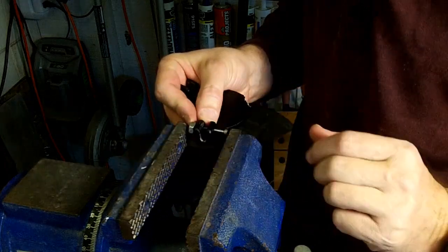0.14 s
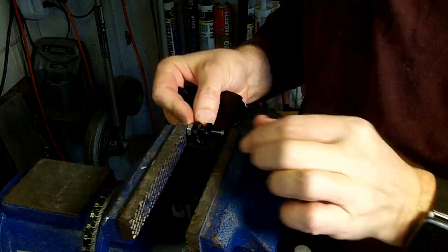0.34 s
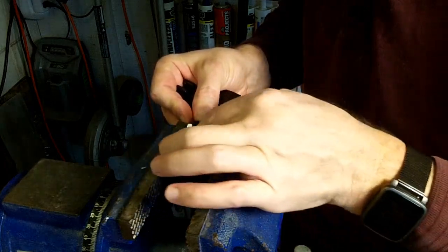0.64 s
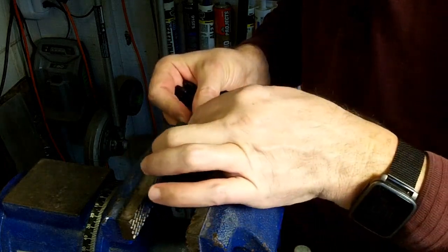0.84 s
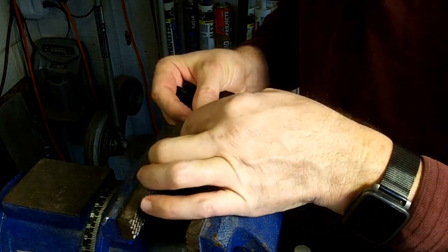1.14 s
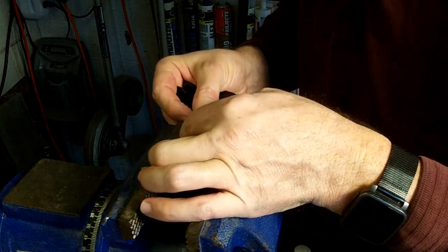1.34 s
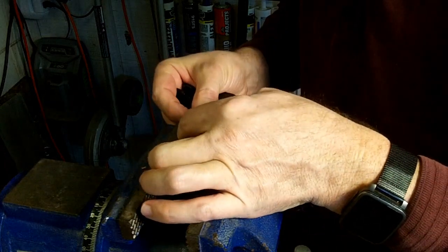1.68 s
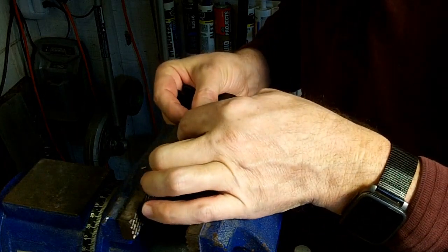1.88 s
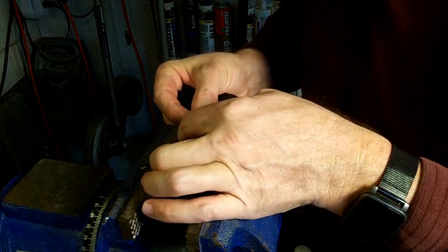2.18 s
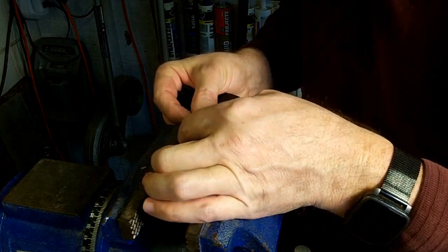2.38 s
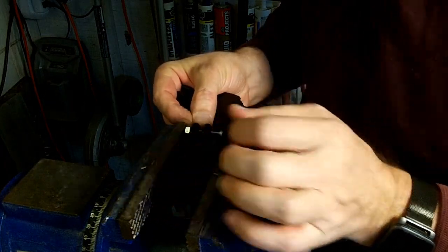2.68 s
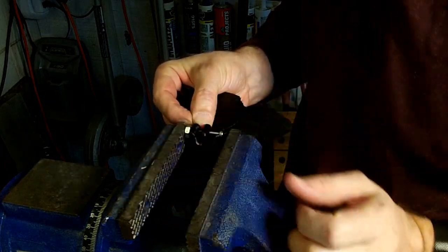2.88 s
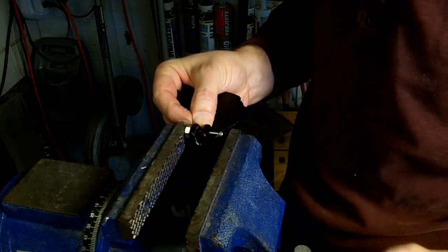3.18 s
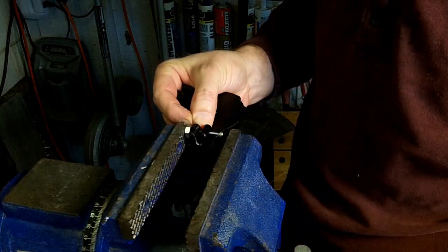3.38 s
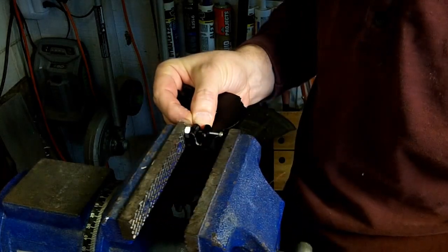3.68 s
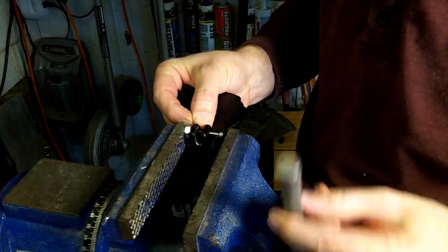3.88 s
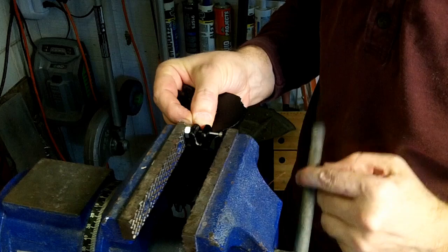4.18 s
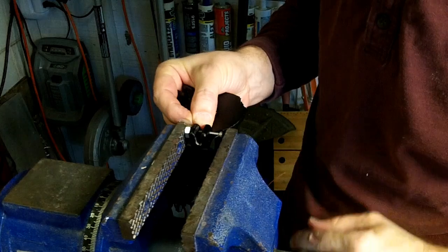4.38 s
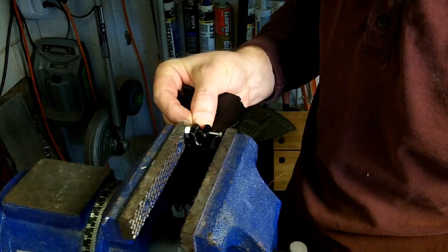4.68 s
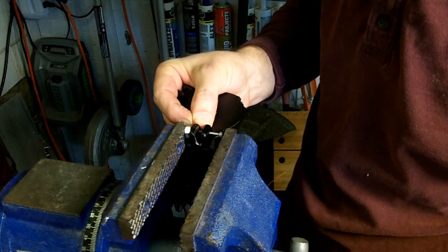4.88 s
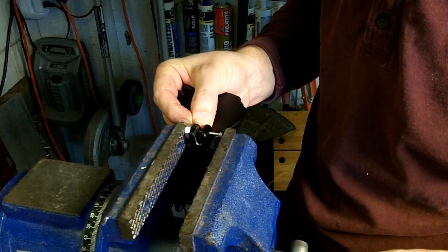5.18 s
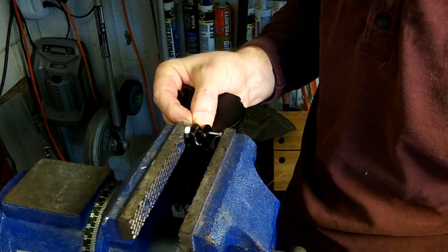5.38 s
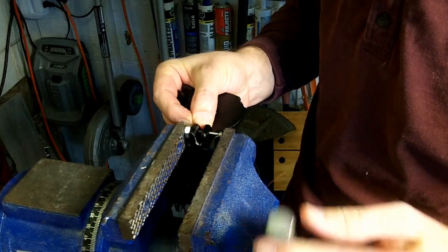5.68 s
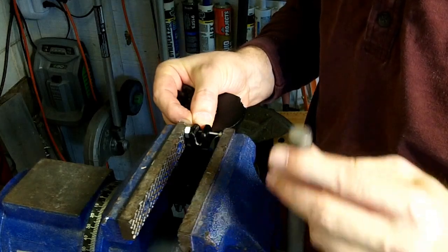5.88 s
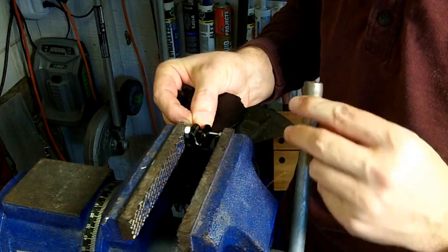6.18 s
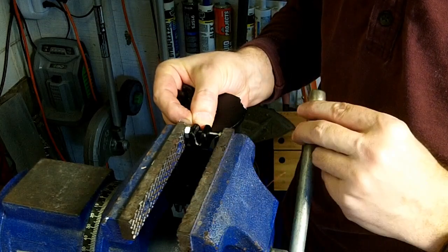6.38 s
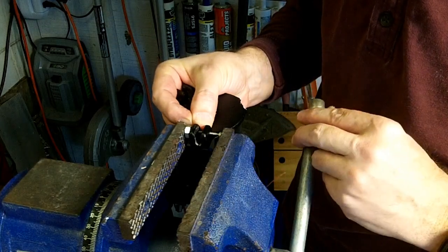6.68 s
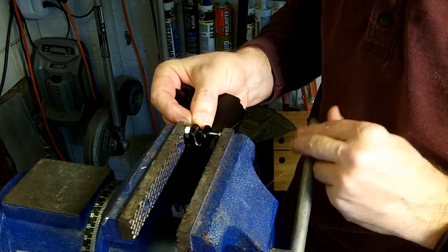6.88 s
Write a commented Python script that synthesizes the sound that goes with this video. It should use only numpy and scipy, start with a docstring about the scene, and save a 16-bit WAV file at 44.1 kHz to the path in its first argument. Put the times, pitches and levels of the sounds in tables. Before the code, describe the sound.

A crisp double click of steel at a vise is followed by sparse, tiny clicks as a part is adjusted. Then come a light clank, thin metal clinks and scattered soft knocks on a wooden workbench, leading to a hard clank of the heavy handle rod, the loudest sound. Everything is heard up close in a small, quiet workshop with low rumble, hum and barely audible ticking.

```python
"""A quiet workshop, where small steel parts are handled at a vise. A clamped part clicks and sets the jaw
ringing; a heavy rod clanks, a thin pin clinks, and the hollow wooden bench answers with knocks and bumps.
Each strike is a set of dying resonances with a crack and a thud of noise, in a short room reverb.
Underneath lie rumble, hum, room air, a thin hiss and a faint ticking that repeats about every second."""
import sys
import numpy as np
from scipy import signal
from scipy.fft import rfft, irfft, next_fast_len
from scipy.io import wavfile
from scipy.ndimage import map_coordinates

SR = 44100
rng = np.random.default_rng(int(sys.argv[2]) if len(sys.argv) > 2 else 0)


def int16_out(signal):
    """Quantize to a 16-bit WAV file."""
    q = np.round(np.clip(np.atleast_2d(signal).T, -1, 1) * 32767)
    wavfile.write(sys.argv[1], SR, q.astype(np.int16))


N = 310717

# Slow level ride of the low end: time_s, rumble_db, hum_db
LOW_END_RIDE = [(0, -63.5, -55), (.4, -56.5, -59), (1.3, -57, -60), (2.3, -58.5, -59), (2.9, -54.5, -59.5),
                (3.65, -55.5, -57.5), (3.95, -61.5, -56.5), (4.15, -54, -55), (4.65, -58, -58.5),
                (5.25, -55.5, -59.5), (5.85, -58, -57.5), (6.12, -51.5, -60), (6.5, -56, -58),
                (7.05, -55.5, -59)]
# Noise colours of the background layers: frequency_hz, density_db
RUMBLE_SPECTRUM = [(9, -31), (18, -1), (24, 3), (31, -2.5), (45, -3), (62, -9), (78, -20.5), (110, -17.5),
                   (150, -50)]
HUM_SPECTRUM = [(47, -48), (80, 3.5), (281, -2.5), (346, -7), (376, -11.5), (500, -15.5), (650, -11.5),
                (1100, -120)]
AIR_SPECTRUM = [(210, -21), (350, -2.5), (377, -7), (407, -5.5), (752, -6), (1100, -9), (1340, -9.5),
                (1660, -9.5), (4870, -14.5), (7000, -20), (9100, -50), (15400, -120)]
HISS_SPECTRUM = [(4000, -32), (6500, -14), (7500, -19.5), (8600, -5), (9200, -1.5), (10900, 0), (13000, .5),
                 (14700, 0.2), (15500, -4.5)]
# Faint tones inside the hum: pitch_hz, rms_db
HUM_TONES = [(47, -66), (296, -74.5)]
# Noise colours of a contact's bright edge and dull body: frequency_hz, density_db
CRACK_SPECTRUM = [(300, -30), (900, -2), (1600, -10.5), (2500, -4), (4200, 1.5), (5600, -9.5), (6500, -18),
                  (7600, -28), (10000, -40), (15000, -45)]
THUD_SPECTRUM = [(100, -36), (250, -3.5), (500, -3.5), (900, -3.5), (1400, -7.5), (2200, -14.5),
                 (4000, -57)]
# Resonances of each struck object: pitch_hz, level_db, t60_s
BENCH_MODES = [(466, -7, 0.086), (685.5, 0, 0.085), (993, -12, 0.065), (1140, -15, 0.085),
               (1235, -8, 0.067), (1290, -9.5, 0.066)]
PART_MODES = [(3526, 1.5, .018), (3180, -2, 0.011), (3800, -9.5, 0.031), (2890, -22, 0.084),
              (4470, -18, 0.019)]
JAW_MODES = [(1347, -5.5, .06), (1497, -16.5, 0.095), (1770, -19.5, 0.053), (2070, -7.5, 0.042)]
PIN_MODES = [(1880, -20, 0.043), (2305, -14, 0.049), (2700, -22, 0.036), (3730, 1.5, 0.068),
             (4110, -4, .04), (5080, -2.5, 0.095), (5590, -4.5, 0.069)]
ROD_MODES = [(2596, -5.5, 0.042), (2854, -12, 0.031), (3660, -3.5, 0.04), (3966, -7, 0.15),
             (4310, -13, .07), (4450, -16, 0.038), (5160, -3.5, 0.049), (5430, -4, 0.046),
             (5754, -1.5, 0.04), (6300, -22, .04), (7150, -16, 0.058), (9200, -31, .025)]
# One round of the ticking: offset_s, level_db
TICK_PATTERN = [(.034, -59), (.130, -57), (.333, -54.5), (.532, -55), (.634, -55.5), (.728, -55.5),
                (.933, -59)]
# A hand bumps the bench: start_s, peak_db, pitch_hz, length_s
HAND_BUMPS = [(3.081, -49, 242, 0.051), (3.583, -49, 201, 0.051), (3.608, -51.5, 239, 0.043),
              (5.791, -46, 359.5, 0.036)]
# Soft knocks on the bench: start_s, ring_db, thud_db, crack_db, rise_ms
BENCH_KNOCKS = [(3.578, -65, -49, -75, 4.8), (4.1106, -44.5, -55, -57, 2.5),
                (4.129, -39.5, -48.5, -52.5, 2), (4.819, -42, -51, -53, 2.5), (4.8344, -61, -54, -55, 1.5),
                (4.862, -51, -62, -72, 5), (5.182, -54, -66, -69, 4.4), (5.4894, -48.5, -66, -67, 1.9),
                (5.746, -48, -59, -67, 3.7), (5.793, -40, -50, -55, 3), (5.826, -49, -52.5, -56, 4),
                (6.4298, -70, -55.5, -51.5, 3.7)]
# The clamped part clicks: start_s, level_db, jaw_relative_db, pitch_ratio
PART_CLICKS = [(.402, -33.5, -15, 1.08), (0.431, -25.5, -7, .99), (0.5074, -52.5, 3, .9),
               (1.0863, -48.5, -11, 1.04), (1.21, -45.5, -11, 0.99), (1.373, -49, -9, 1.1),
               (2.32, -52, -10, 1.2), (2.3594, -55, -6, 1.2)]
# The thin pin is struck: start_s, ring_db, brightness_db_per_octave, crack_db
PIN_CLINKS = [(3.924, -37.5, -7, -54), (3.9316, -53, 6, -48), (3.9606, -49, 6, -60), (4.4458, -47, 17, -54),
              (5.6697, -37.5, -18, -46), (5.6777, -46, -1, -48.5), (5.763, -31, .1, -48)]
# The heavy rod is struck: start_s, ring_db, crack_db, bench_db, thud_db, rise_ms
ROD_CLANKS = [(3.5097, -42, -28, -44, -48.5, .22), (5.7629, -21, -20, -25.5, -38, 0.5),
              (5.7695, -27.5, -32, -34, -58, .8)]
# Reverb time of the workshop: frequency_hz, t60_s
ROOM_DECAY = [(300, 0.24), (2000, 0.22), (8000, 0.14)]
# Dead spots of the microphone: centre_hz, width_hz, gain_db
MIC_DIPS = [(8080, 260, -9.5), (7060, 210, -2), (11910, 160, -9)]

HARD_CRACK_T60_S, SOFT_CRACK_T60_S = 0.026, 0.047


def amp(db):
    return 10 ** (np.asarray(db) / 20)


def curve_at(points, hz):
    """Read a curve of (frequency_hz, value) points on a log frequency axis."""
    frequencies, values = np.transpose(points)
    return np.interp(np.log(hz + 1), np.log(frequencies + 1), values)


def equalise(x, gain_at):
    """Shape x with a gain that depends on frequency."""
    size = next_fast_len(len(x) + 8192)
    return irfft(rfft(x, size) * gain_at(np.fft.rfftfreq(size, 1 / SR)), size)[:len(x)]


def noise(spectrum, size):
    """Coloured noise of rms 1."""
    x = equalise(rng.standard_normal(size), lambda hz: amp(curve_at(spectrum, hz)))
    return x / np.sqrt(np.mean(x ** 2) + 1e-20)


def drift(rate_hz):
    """A smooth random curve through rate_hz points a second."""
    points = rng.standard_normal(int(N * rate_hz / SR) + 4)
    return map_coordinates(points, [np.arange(N) * rate_hz / SR])


def attack(t, rise_ms):
    return 1 - np.exp(-1000 * t / rise_ms)


def burst(spectrum, t60_s, rise_ms):
    """Coloured noise that jumps up and dies away."""
    t = np.arange(SR // 4) / SR
    return noise(spectrum, len(t)) * amp(-60 * t / t60_s) * attack(t, rise_ms)


def ring(modes, rise_ms, rough):
    """Damped modes, each struck at a slightly new strength and shaken by the rattling contact; peak 1."""
    t = np.arange(SR // 4) / SR
    hz, db, t60_s = np.transpose(modes)[:, :, None]
    phase_wander = rough * np.cumsum(rng.standard_normal((len(modes), len(t))), axis=1)
    decay_db = db + 2 * rng.standard_normal(hz.shape) - 60 * t / t60_s
    partials = amp(decay_db) * np.sin(2 * np.pi * hz * t + phase_wander)
    x = partials.sum(axis=0) * attack(t, rise_ms)
    return x / np.abs(x).max()


def in_room(x, wet_db=-9.5):
    """Add the workshop's reverb: a new noise tail each time, its treble dying first."""
    hz, t, bands = signal.stft(rng.standard_normal(SR // 3), SR, nperseg=256)
    decay = amp(-60 * t / curve_at(ROOM_DECAY, hz)[:, None])
    tail = signal.istft(bands * decay, SR, nperseg=256)[1]
    predelayed = np.pad(x, (130, 0))  # about 3 ms
    wet = signal.fftconvolve(predelayed, tail / np.linalg.norm(tail))
    return np.pad(x, (0, len(wet) - len(x))) + amp(wet_db) * wet


def place(track, start_s, x):
    span = track[round(start_s * SR):][:len(x)]
    span += x[:len(span)]


def room_tone():
    """Rumble and hum swell and sink slowly under nearly even air and hiss."""
    time_s, rumble_db, hum_db = np.transpose(LOW_END_RIDE)
    t = np.arange(N) / SR
    rumble = amp(np.interp(t, time_s, rumble_db) + 1.04 * drift(8)) * noise(RUMBLE_SPECTRUM, N)
    hum = amp(np.interp(t, time_s, hum_db) + 0.31 * drift(4.9)) * noise(HUM_SPECTRUM, N)
    for hz, db in HUM_TONES:
        peak = np.sqrt(2) * amp(db + 2.1 * drift(2.46))
        hum += peak * np.sin(2 * np.pi * (hz * t + 0.3 * drift(1.5)))
    air = amp(-60.5 + 0.4 * drift(3)) * noise(AIR_SPECTRUM, N)
    hiss = amp(-66.5) * noise(HISS_SPECTRUM, N)
    return rumble + hum + air + hiss


def ticking(round_s=1.0008, scatter_s=0.0015, scatter_db=1.5):
    """Tiny high resonances tick in a loop, a little uneven in timing and level."""
    out = np.zeros(N)
    for start_s in np.arange(0, N / SR, round_s):
        for offset_s, db in TICK_PATTERN:
            late_s, louder_db = rng.standard_normal(2) * [scatter_s, scatter_db]
            tick = ring([(4660, -5, 0.017), (4970, -2, 0.015)], rise_ms=0.56, rough=0.057)
            place(out, start_s + offset_s + late_s, amp(db + louder_db) * tick)
    return out


def hand_bumps():
    """A hand meets the bench top: one soft, low swell of tone."""
    out = np.zeros(N)
    for start_s, db, hz, length_s in HAND_BUMPS:
        t = np.arange(round(length_s * SR)) / SR
        swell = np.sin(np.pi * t / length_s)
        place(out, start_s, amp(db) * swell * np.sin(2 * np.pi * hz * t))
    return out


def thud(db, contact_rise_ms):
    """The dull body of a contact, a little slower than its edge."""
    return amp(db) * burst(THUD_SPECTRUM, t60_s=0.19, rise_ms=contact_rise_ms + 1.3)


def bench_ring(db, contact_rise_ms):
    """The hollow bench rings; the softer the contact, the weaker its modes above 700 Hz."""
    rolloff_db_per_octave = 3 * contact_rise_ms
    modes = [(hz, mode_db - rolloff_db_per_octave * max(np.log2(hz / 700), 0), t60_s)
             for hz, mode_db, t60_s in BENCH_MODES]
    return amp(db) * ring(modes, rise_ms=contact_rise_ms + 0.97, rough=0.045)


def bench_knocks():
    """Steel touches wood with a soft attack: hollow ring, thud and a light crack."""
    out = np.zeros(N)
    for start_s, ring_db, thud_db, crack_db, rise_ms in BENCH_KNOCKS:
        wood = bench_ring(ring_db, rise_ms) + thud(thud_db, rise_ms)
        crack = amp(crack_db) * burst(CRACK_SPECTRUM, SOFT_CRACK_T60_S, rise_ms)
        place(out, start_s, in_room(wood + crack))
    return out


def part_clicks():
    """The clamped part snaps and rings briefly; the vise jaw blooms just behind it."""
    out = np.zeros(N)
    hardest_db = max(db for _, db, _, _ in PART_CLICKS)
    for start_s, db, jaw_db, pitch_ratio in PART_CLICKS:
        modes = [(hz * pitch_ratio, mode_db, t60_s) for hz, mode_db, t60_s in PART_MODES]
        ting_db = -9.5 + 3 * (db - hardest_db)  # the high ting drops away fast on softer clicks
        ting_modes = [(10000, ting_db - 2, 0.0088), (10500, ting_db, 0.014)]
        steel = ring(modes + ting_modes, rise_ms=0.33, rough=0.07)
        crack = amp(-12.5) * burst(CRACK_SPECTRUM, t60_s=0.033, rise_ms=0.27)
        jaw = ring(JAW_MODES, rise_ms=3.8, rough=0.057)
        jaw += amp(-15.5) * burst(THUD_SPECTRUM, t60_s=0.11, rise_ms=2.6)
        click = steel + crack + amp(jaw_db) * jaw
        place(out, start_s, amp(db) * in_room(click, wet_db=-10))
    return out


def pin_clinks(rise_ms=0.8):
    """The thin pin rings over a light thud; the strike point makes it brighter or darker."""
    out = np.zeros(N)
    for start_s, ring_db, brightness, crack_db in PIN_CLINKS:
        modes = [(hz, db + brightness * np.log2(hz / 4400), t60_s) for hz, db, t60_s in PIN_MODES]
        steel = amp(ring_db) * ring(modes, rise_ms, rough=0.043)
        crack = amp(crack_db) * burst(CRACK_SPECTRUM, SOFT_CRACK_T60_S, rise_ms)
        place(out, start_s, in_room(steel + crack + thud(ring_db - 11, rise_ms)))
    return out


def rod_clanks():
    """The heavy rod lands with a hard crack and rings; the bench gives the hit its weight."""
    out = np.zeros(N)
    for start_s, ring_db, crack_db, bench_db, thud_db, rise_ms in ROD_CLANKS:
        steel = amp(ring_db) * ring(ROD_MODES, rise_ms, rough=0.037)
        crack = amp(crack_db) * burst(CRACK_SPECTRUM, HARD_CRACK_T60_S, rise_ms)
        wood = bench_ring(bench_db, rise_ms) + thud(thud_db, rise_ms)
        place(out, start_s, in_room(steel + crack + wood))
    return out


def scene():
    """The mono mix: background bed, wood, then steel on top."""
    bed = room_tone() + ticking()
    wood = hand_bumps() + bench_knocks()
    steel = part_clicks() + pin_clinks() + rod_clanks()
    return (bed + wood + steel)[None]


def record(dry):
    """The microphone has a few narrow dead spots in the treble and a hard band limit."""
    def mic_gain(hz, top_hz=15550):
        dips_db = sum(db * np.exp(-((hz - centre) / width) ** 2) for centre, width, db in MIC_DIPS)
        return amp(dips_db) * (hz < top_hz)

    return equalise(dry[0], mic_gain)[None]


dry = scene()
out = record(dry)
int16_out(out)
```